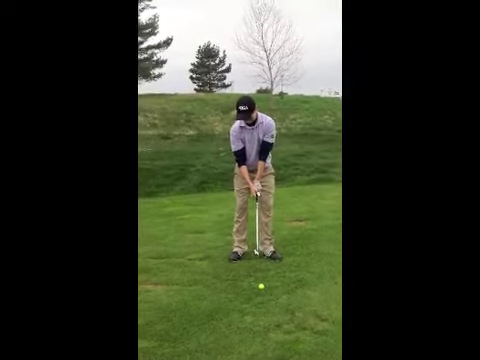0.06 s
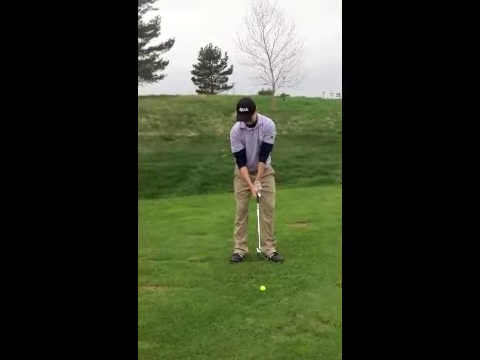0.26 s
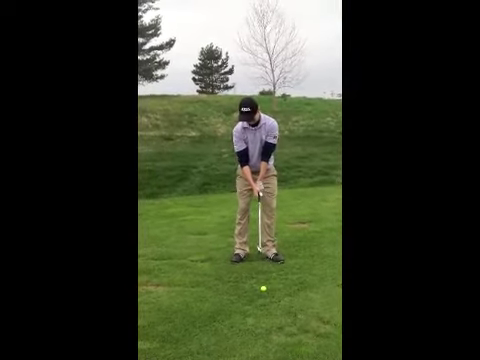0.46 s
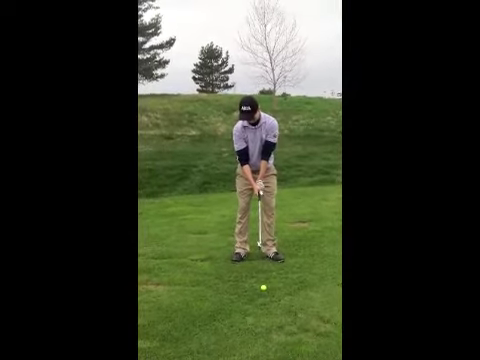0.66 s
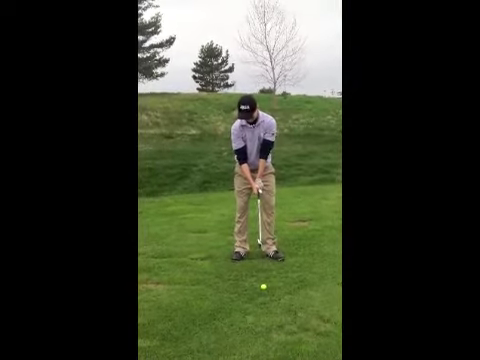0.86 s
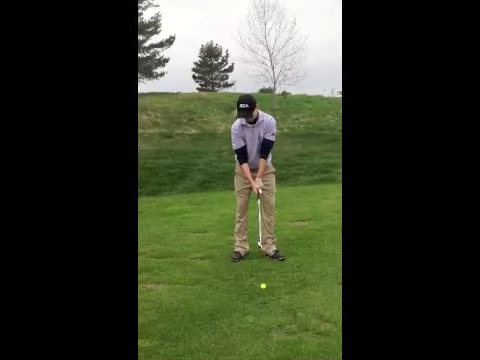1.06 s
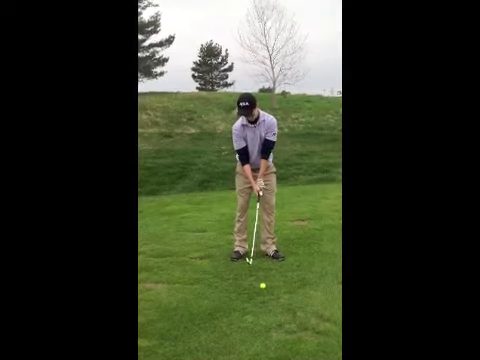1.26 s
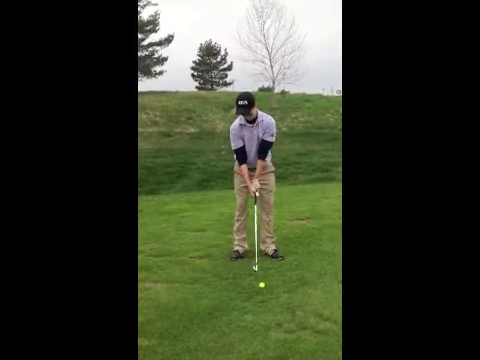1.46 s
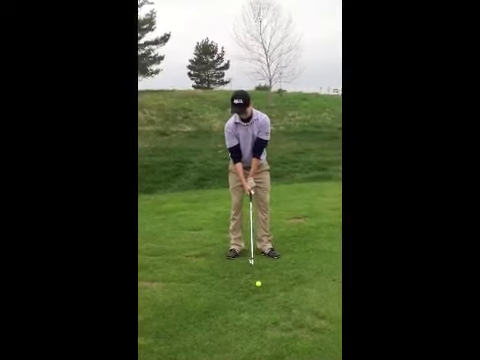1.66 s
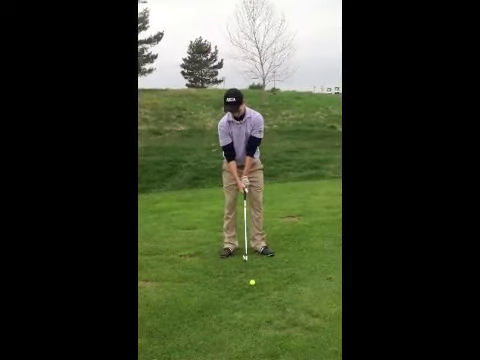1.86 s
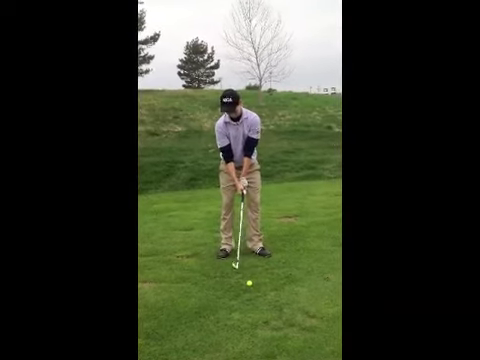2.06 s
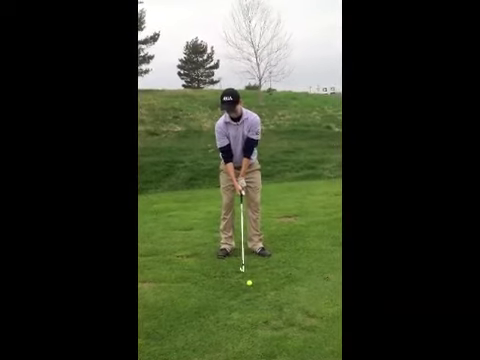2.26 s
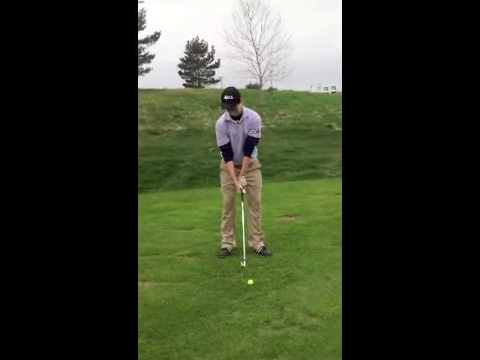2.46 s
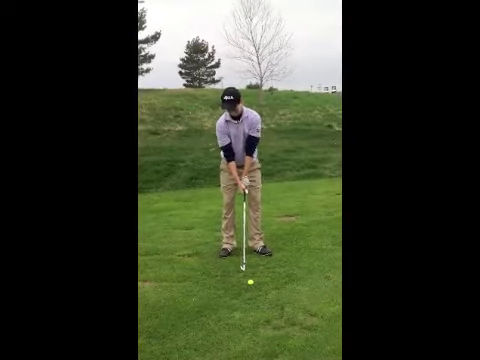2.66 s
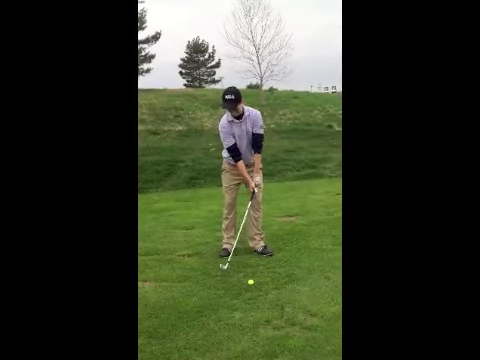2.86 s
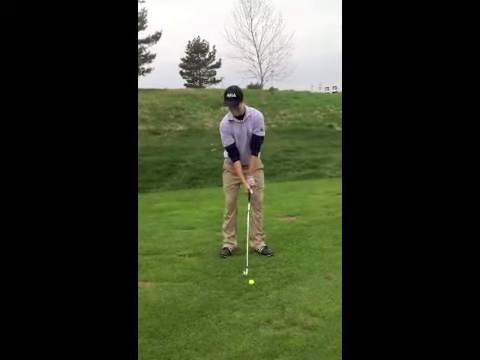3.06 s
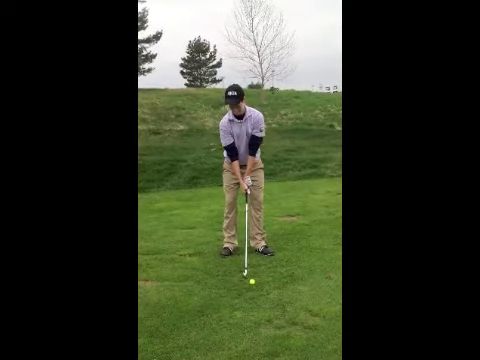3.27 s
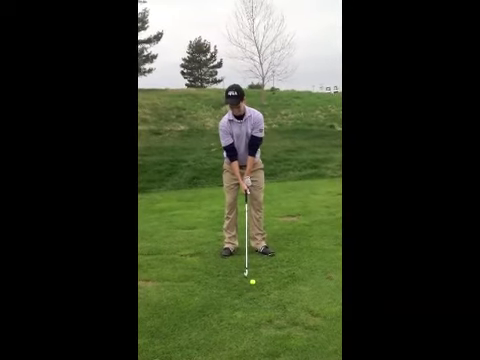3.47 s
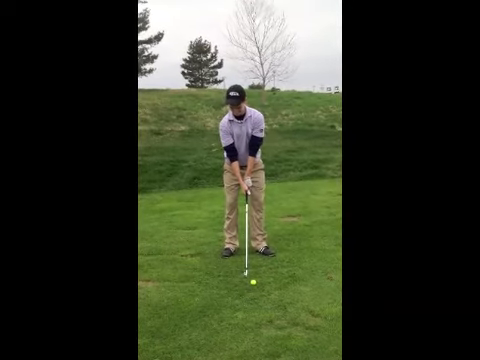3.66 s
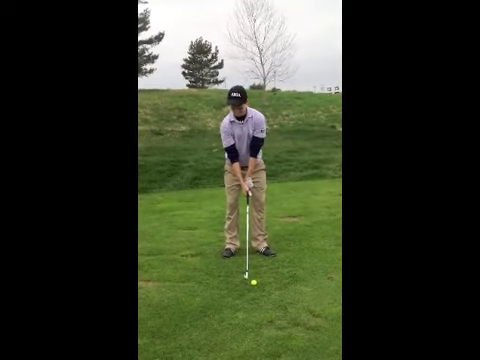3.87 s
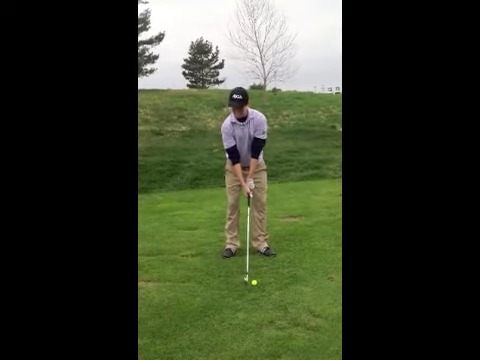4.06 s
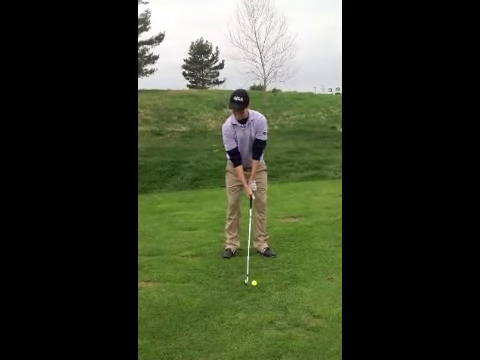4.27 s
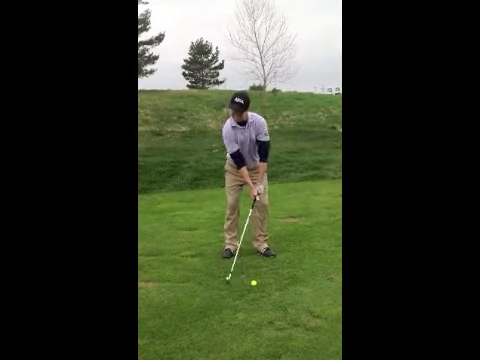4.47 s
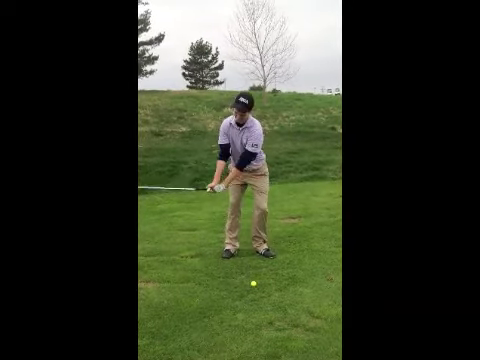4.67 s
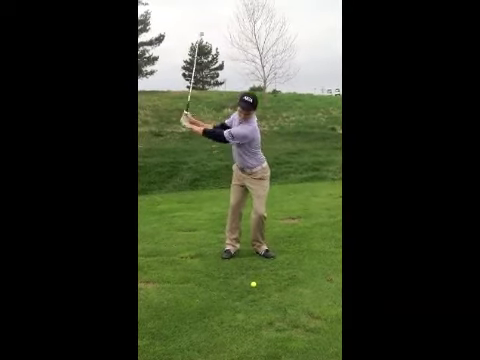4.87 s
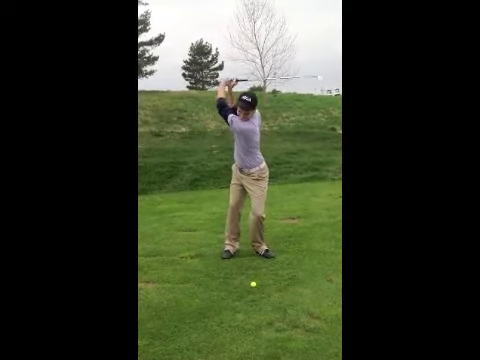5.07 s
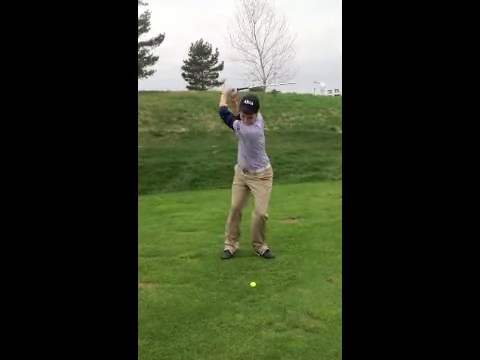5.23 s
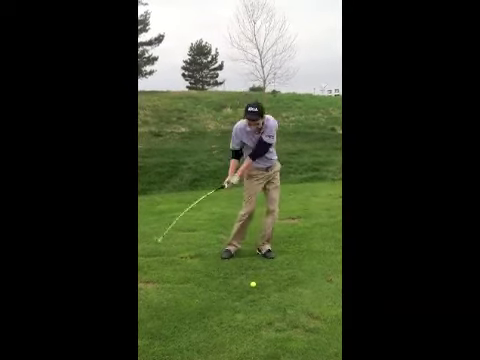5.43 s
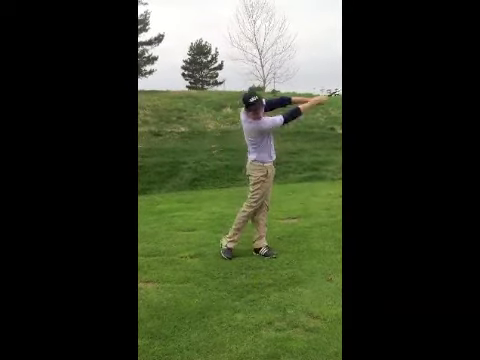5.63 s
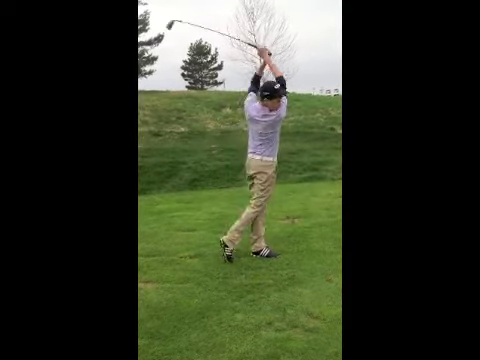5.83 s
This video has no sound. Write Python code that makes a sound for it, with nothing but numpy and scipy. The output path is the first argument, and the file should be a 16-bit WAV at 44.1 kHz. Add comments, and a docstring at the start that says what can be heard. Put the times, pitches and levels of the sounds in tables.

```python
"""On an open practice green a golfer swings an iron: shed vortices make the shaft swish, a broadband snap
and damped modes make the face crack on the ball, and shaped noise is the turf being cut. A grass bank and
trees scatter a faint tail. Before the swing come two soft knocks near the microphone (damped low modes)
and a few tiny ticks. Filtered noise gives distant traffic, light air, clothing and a camera lens's buzz."""
import sys
import numpy as np
from scipy import signal
from scipy.fft import rfft, irfft, next_fast_len
from scipy.io import wavfile
from scipy.ndimage import map_coordinates

SR = 44100
rng = np.random.default_rng(int(sys.argv[2]) if len(sys.argv) > 2 else 0)


def unload_audio(sound):
    """Save the sound as a 16-bit wav file, at the path given as the first command line argument."""
    columns = np.transpose(np.atleast_2d(sound))
    # keep every value between -1 and 1, then stretch to whole-number steps
    steps = np.round(np.clip(columns, -1, 1) * 32767)
    wavfile.write(sys.argv[1], SR, steps.astype(np.int16))


N = 260190


def amp(db):
    """Logarithmic level: decibels become an amplitude gain."""
    return 10 ** (np.asarray(db) / 20)


def unit(x):
    """Normalisation: scale to rms 1."""
    return x / np.sqrt(np.mean(np.abs(x) ** 2) + 1e-20)


def along(points, hz):
    """Interpolation: read (frequency, value) points on a logarithmic frequency axis."""
    f, v = np.transpose(points)
    return np.interp(np.log(hz + 1), np.log(f + 1), v)


def wobble(rate):
    """Slow random modulation: a smooth curve through rate random knots a second."""
    knots = rng.standard_normal(int(N * rate / SR) + 4)
    return map_coordinates(knots, [np.arange(N) * rate / SR])


def filtered(x, response):
    """Linear filtering: multiply the spectrum of x by a response of frequency."""
    m = next_fast_len(N + SR // 2)
    return irfft(rfft(x, m) * response(np.fft.rfftfreq(m, 1 / SR)), m)[:N]


def noise(spectrum):
    """Spectral shaping: white noise coloured by a spectrum, rms 1."""
    white = rng.standard_normal(N)
    return unit(filtered(white, lambda hz: amp(along(spectrum, hz))))


def decay(t, t60):
    """Exponential decay: down by 60 dB after t60 seconds."""
    return np.exp(-np.log(1000) * t / t60)


def fade(start, t60, attack):
    """Onset and decay: an envelope that rises at start and dies away."""
    t = np.maximum(np.arange(N) / SR - start, 0)
    return (1 - np.exp(-t / attack)) * decay(t, t60)


def ring(modes, attack, share=1):
    """Modal superposition: damped sines struck together; share scales their ring time."""
    t = np.arange(SR // 4) / SR
    tones = sum(amp(db) * np.sin(2 * np.pi * hz * t) * decay(t, t60 * share) for hz, db, t60 in modes)
    return tones * (1 - np.exp(-t / attack))


def pulse(spectrum, size=4096):
    """Minimum phase: the most compact causal pulse with this spectrum, peak 1."""
    cepstrum = irfft(np.log(amp(along(spectrum, np.fft.rfftfreq(size, 1 / SR)))))
    # folding the cepstrum onto positive time makes the pulse causal
    shape = irfft(np.exp(rfft(2 * cepstrum[:size // 2], size)))
    return shape / np.abs(shape).max()


def add(track, s, sound):
    """Superposition: mix a sound into the track at time s."""
    room = track[round(s * SR):][:len(sound)]
    room += sound[:len(room)]


def swell(s, width):
    """Gaussian envelope: a smooth bell of height 1 around time s."""
    return np.exp(-((np.arange(N) / SR - s) / width) ** 2)


def surge(s, time):
    """Hyperbolic secant envelope: a rounded peak of height 1 with exponential rise and fall."""
    away = np.exp(-np.abs(np.arange(N) / SR - s) / time)
    return 2 * away / (1 + away ** 2)


# contacts of the head, ball first and then turf: (time [s], thock level [dB], click level [dB])
CONTACTS = [(5.5266, -4.5, -14), (5.5296, -9, -31), (5.5325, -8.5, -47), (5.5358, -20, -41)]
# hollow thock of one contact: (frequency [Hz], relative level [dB])
THOCK_SPECTRUM = [(50, -65), (130, -30), (215, -0.5), (350, -9.5), (550, -3), (850, 4.5), (1200, 5),
                  (1500, 2), (1820, 1.5), (2100, -24.5), (3080, -10.5), (3350, -31), (8000, -51)]
# modes of ball and club head: (frequency [Hz], relative level [dB], t60 [s])
CLUB_MODES = [(2537, -11.5, 0.026), (2894, -8.5, 0.019), (2940, -8, 0.019), (4750, -4.5, 0.012),
              (5950, -9.5, 0.016), (6220, -21, .018), (8100, -16, 0.023), (7940, -16, .013),
              (8400, -16, 0.032), (9250, -18, 0.0089), (9700, -11, .012), (10700, -23, 0.023),
              (10900, -14, 0.028), (13400, -21, .016)]
# first snap of face on ball: (frequency [Hz], relative level [dB])
SNAP_SPECTRUM = [(1500, -14), (4200, -9), (5400, -34), (6200, 2.5), (7500, -3.5), (9500, -2.5),
                 (11200, -14), (12500, -22), (13800, -10), (16000, -14)]
# torn grass: (frequency [Hz], relative level [dB])
GRASS_SPECTRUM = [(600, -5), (1400, -17), (2100, -25), (2900, 0), (3450, -14), (5500, -8), (6200, -2),
                  (8200, 3), (9300, -1), (10800, 2.5), (12600, -12), (13600, -5), (15500, -17)]


def strike():
    """Impact excitation: the face snaps on the ball and the head rings as the sole tears the grass."""
    out = np.zeros(N)
    thock, click = pulse(THOCK_SPECTRUM), ring(CLUB_MODES, attack=0.0001)
    for k, (s, thock_db, click_db) in enumerate(CONTACTS):
        # the head is jolted to and fro, so successive thocks alternate in sign
        add(out, s, (-1) ** k * amp(thock_db) * thock)
        add(out, s, amp(click_db) * click)
    impact = CONTACTS[0][0]
    add(out, impact, amp(-3.5) * pulse(SNAP_SPECTRUM))
    grass = amp(-21) * noise(GRASS_SPECTRUM) * fade(impact - 0.002, t60=0.039, attack=0.0015)
    return out + grass


IMPACT_S = 5.5266  # the face meets the ball
# vortex pitch at impact, its rise before and fall after, and the pitch of the slow club
SWISH_HZ, CLIMB_HZ_PER_S, SAG_HZ_PER_S, SLOW_HZ = 713.5, 3900, 3900, 441.7
# vortices along the club: (multiple of the pitch [ratio], flutter corner / pitch at impact [ratio],
# relative level [dB])
VORTICES = [(1, 0.094, 1), (1.45, 0.13, -3), (2.3, 0.22, -6), (2.9, .13, -23), (4, 0.21, -18.5)]
# surges as the club sweeps round: (peak time [s], rise and fall time constant [s],
# lowest vortex level [dB], upper vortices relative to the lowest [dB])
SURGES = [(5.463, 0.0077, -43, 6.5), (5.488, 0.009, -26, -2.5), (5.5025, 0.0047, -27.5, 1),
          (5.524, 0.0059, -23, -8)]
# fine rustle of cloth, air and grass: (frequency [Hz], relative level [dB])
RUSTLE_SPECTRUM = [(1500, -36), (3500, -8), (5800, -4.5), (7300, 4.5), (8500, -7), (10800, -3.5),
                   (12500, -17), (13800, -10), (15500, -30)]


def swish():
    """Vortex shedding: pitch climbs with club speed; thinner, faster parts sing higher."""
    t = np.arange(N) / SR - IMPACT_S
    glide = np.minimum(CLIMB_HZ_PER_S * t, -SAG_HZ_PER_S * t)
    pitch = np.maximum(SWISH_HZ + glide, SLOW_HZ)
    phase = 2 * np.pi * np.cumsum(pitch) / SR
    lowest = sum(amp(db) * surge(s, time) for s, time, db, _ in SURGES)
    upper = sum(amp(db + upper_db) * surge(s, time) for s, time, db, upper_db in SURGES)
    air = amp(-28.5) * lowest * noise(RUSTLE_SPECTRUM)
    for k, (multiple, width, part_db) in enumerate(VORTICES):
        corner_hz = width * multiple * SWISH_HZ
        band = lambda hz: 1 / (1 + (hz / corner_hz) ** 4)
        in_phase = filtered(rng.standard_normal(N), band)
        quadrature = filtered(rng.standard_normal(N), band)
        flutter = unit(in_phase + 1j * quadrature)
        # shedding keeps a fairly even strength while its phase wanders
        flutter = unit(flutter / (np.abs(flutter) + 0.74))
        envelope = upper if k else lowest
        air += amp(part_db) * envelope * np.real(flutter * np.exp(1j * multiple * phase))
    return air


# colour of the scatter from bank and trees: (frequency [Hz], relative level [dB])
SCATTER_SPECTRUM = [(150, -8), (500, -21), (900, 0.5), (1500, -10), (2300, 10.5), (4000, -6), (6000, 3),
                    (7300, 4), (10500, 0), (14000, 2)]
# ring time of the scatter: (frequency [Hz], t60 [s])
SCATTER_T60 = [(200, .8), (900, 1.6), (2500, 0.29), (7000, 0.47), (14000, 0.51)]


def field(x):
    """Diffuse scattering: convolution with a noise tail whose decay time depends on frequency."""
    hz, t, z = signal.stft(rng.standard_normal(SR), SR, nperseg=256)
    dying = z * decay(t, along(SCATTER_T60, hz)[:, None])
    tail = unit(signal.istft(dying, SR)[1]) / np.sqrt(SR)
    scattered = signal.fftconvolve(x, tail)[:N]
    return filtered(scattered, lambda f: amp(along(SCATTER_SPECTRUM, f)))


# soft knocks: (time [s], level [dB], share of the full ring time [ratio], brightness [dB per octave],
# tap level [dB])
KNOCKS = [(2.4083, -26, 0.89, -0.5, -29.5), (4.1296, -39.5, 0.25, 11.5, -41)]
# modes of the knocked body: (frequency [Hz], level before brightness [dB], full t60 [s])
BODY_MODES = [(146, 8.5, .11), (259, 5, 0.089), (390, 4, 0.055), (610, -15, 0.065)]
# contact noise: (frequency [Hz], relative level [dB])
TAP_SPECTRUM = [(100, -40), (300, 2), (800, 1), (1050, 1), (1250, 10.5), (1500, -4), (1720, 11),
                (2000, -19), (2300, -26), (4000, -41)]
TAP_LEAD_S = 0.001  # the tap starts just before the body rings


def knocks():
    """Modal excitation: a tap, then a small hollow body rings; the fainter, shorter knock is brighter."""
    out, tap = np.zeros(N), noise(TAP_SPECTRUM)
    lowest_hz = BODY_MODES[0][0]
    for s, db, share, bright_db, tap_db in KNOCKS:
        for k, (hz, level, t60) in enumerate(BODY_MODES):
            mode = (hz, level + bright_db * np.log2(hz / lowest_hz), t60)
            # neighbouring modes swing in opposite directions
            add(out, s, (-1) ** k * amp(db) * ring([mode], attack=0.0031, share=share))
        out += amp(tap_db) * tap * fade(s - TAP_LEAD_S, t60=0.016, attack=0.0011)
    # so small a body radiates hardly any bass
    return signal.sosfilt(signal.butter(2, 95, "highpass", fs=SR, output="sos"), out)


# tiny ticks: (time [s], tap level [dB], treble level [dB])
TICKS = [(0.1034, -36.5, -53), (1.106, -57, -64), (1.563, -40.5, -68), (1.663, -39, -70), (4.172, -44, -66)]


def ticks():
    """Transient noise: tiny dry contacts that die within milliseconds."""
    tap, fizz = noise(TAP_SPECTRUM), noise(RUSTLE_SPECTRUM)
    out = np.zeros(N)
    for s, db, treble_db in TICKS:
        contact = amp(db) * tap + amp(treble_db) * fizz
        out += contact * fade(s, t60=0.0077, attack=0.00074)
    return out


# backswing, then swing-through: (peak time [s], half-width [s], fine rustle level [dB],
# soft brushing level [dB])
MOVES = [(4.5, 0.57, -80, -65.5), (5.62, 0.29, -68, -59)]
# soft brushing of cloth, also the air in the trees: (frequency [Hz], relative level [dB])
TREES_SPECTRUM = [(800, -33), (1100, 3.5), (1750, 2.5), (2000, -7), (2400, -5.5), (2900, -9), (3300, -19.5),
                  (6000, -28)]


def clothes():
    """Friction noise: cloth rustles and brushes each time the body turns."""
    rustle, brush = noise(RUSTLE_SPECTRUM), noise(TREES_SPECTRUM)
    out = np.zeros(N)
    for s, width, rustle_db, brush_db in MOVES:
        out += swell(s, width) * (amp(rustle_db) * rustle + amp(brush_db) * brush)
    return out


# lens mechanism: (frequency [Hz], relative level [dB])
LENS_SPECTRUM = [(900, -27), (1400, -2), (1750, -16), (2050, -0.5), (2450, 2.5), (2950, -1.5), (3350, -26),
                 (3750, -4), (4200, -17), (9000, -21), (15000, -37)]
FRAME_HZ = 29.96  # buzz pulses a second
FOCUS_S, FOCUS_HALF_WIDTH_S, FOCUS_DB = 1.38, 0.22, -69.5


def lens():
    """Amplitude modulation: a camera lens buzzes once a frame, and whirrs briefly as it focuses."""
    since = np.arange(N) / SR % (1 / FRAME_HZ)
    buzz = amp(-66 + 1.3 * wobble(25)) * np.exp(-((since - 0.0036) / 0.0024) ** 4)
    whirr = amp(FOCUS_DB) * swell(FOCUS_S, FOCUS_HALF_WIDTH_S)
    return buzz * noise(LENS_SPECTRUM) + whirr * noise(LENS_SPECTRUM)


# low rumble: (frequency [Hz], relative level [dB])
RUMBLE_SPECTRUM = [(20, -4), (35, -22), (60, -28), (100, -18), (140, -2), (204, 2.5), (243, 5), (320, -5.5),
                   (386, 1.5), (500, -12), (650, -44), (1100, -120)]
# far road: (frequency [Hz], relative level [dB])
ROAD_SPECTRUM = [(300, -11.5), (450, 1), (530, 2), (615, -0.5), (690, 1.5), (800, 2.5), (930, 2),
                 (1030, -2), (1200, -42), (2000, -73)]
# even hiss: (frequency [Hz], relative level [dB])
HISS_SPECTRUM = [(100, -5.5), (2500, 0.5), (4000, -2.5), (6000, -2.5), (12000, -3), (15200, -5)]
# wind on the microphone: (frequency [Hz], relative level [dB])
BUFFET_SPECTRUM = [(20, -5), (60, -11), (95, 14), (140, 11), (300, -42)]
# distant hum: (frequency [Hz], relative level [dB])
HUM_SPECTRUM = [(250, -42), (340, -5), (385, 6), (430, -5), (560, -46)]
# traffic swells: (peak time [s], half-width [s], rise [dB])
TRAFFIC = [(0.06, 0.13, 4), (1.32, 0.26, 3.5), (1.84, 0.15, 4), (2.77, 0.17, 2.5), (4.42, 0.32, 4),
           (5.2, 0.22, 3.5), (5.66, 0.25, 6)]
# the rumble's own sinking and lifting: (peak time [s], half-width [s], change [dB])
RUMBLE_DRIFTS = [(1.0, 0.2, -2.5), (1.28, 0.08, 2), (2.22, 0.21, -4), (4.27, 0.082, 3), (5.06, 0.092, 2),
                 (5.72, 0.15, -0.5)]
# puffs of wind: (peak time [s], half-width [s], level [dB])
PUFFS = [(0.6, 0.37, -63.5), (1.29, 0.06, -70), (3.86, 0.43, -64), (4.26, 0.063, -67)]
RUMBLE_DB, ROAD_DB, TREES_DB, HISS_DB = -51.5, -56.5, -66, -70.5  # levels before swells and drifts
RUMBLE_SHARE = 0.083  # rumble rise per traffic rise [dB per dB]
HUM_S, HUM_HALF_WIDTH_S, HUM_DB = 5.1, 0.23, -52.5


def background():
    """Incoherent sum: swelling traffic, a hum, air in trees and wind puffs add over an even hiss."""
    traffic_db = sum(db * swell(s, width) for s, width, db in TRAFFIC)
    drift_db = sum(db * swell(s, width) for s, width, db in RUMBLE_DRIFTS)
    rumble = amp(RUMBLE_DB + RUMBLE_SHARE * traffic_db + drift_db) * noise(RUMBLE_SPECTRUM)
    road = amp(ROAD_DB + traffic_db) * noise(ROAD_SPECTRUM)
    trees = amp(TREES_DB + 0.33 * wobble(3.02)) * noise(TREES_SPECTRUM)
    wind = sum(amp(db) * swell(s, width) for s, width, db in PUFFS)
    breeze = wind * amp(1.3 * wobble(9)) * noise(BUFFET_SPECTRUM)
    hum = amp(HUM_DB) * swell(HUM_S, HUM_HALF_WIDTH_S) * noise(HUM_SPECTRUM)
    hiss = amp(HISS_DB) * noise(HISS_SPECTRUM)
    return rumble + road + trees + breeze + hum + hiss


def scene():
    """Superposition: the shot with its outdoor tail, and the quiet sounds around it."""
    shot = strike() + swish()
    tail = amp(-28.5) * field(shot)
    nearby = knocks() + ticks() + clothes() + lens()
    return (shot + tail + nearby + background())[None]


TOP_HZ = 15500  # middle of the upper band edge


def record(dry):
    """Band limiting: the microphone sheds deep bass and keeps nothing above its upper edge."""
    thin = signal.sosfilt(signal.butter(3, 72, "highpass", fs=SR, output="sos"), dry[0])
    # the upper edge slopes to zero over 300 Hz
    return filtered(thin, lambda hz: np.clip((TOP_HZ - hz) / 300 + 0.5, 0, 1))[None]


dry = scene()
out = record(dry)
unload_audio(out)
```